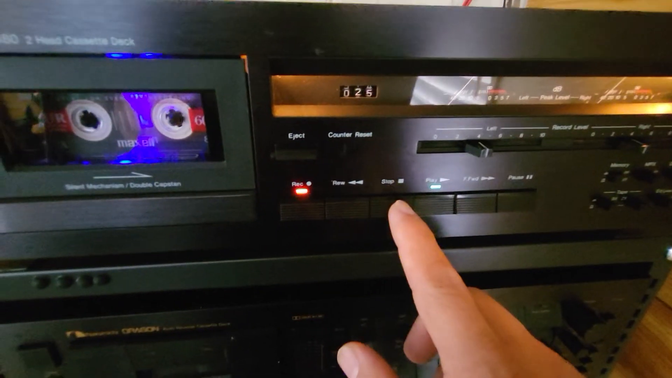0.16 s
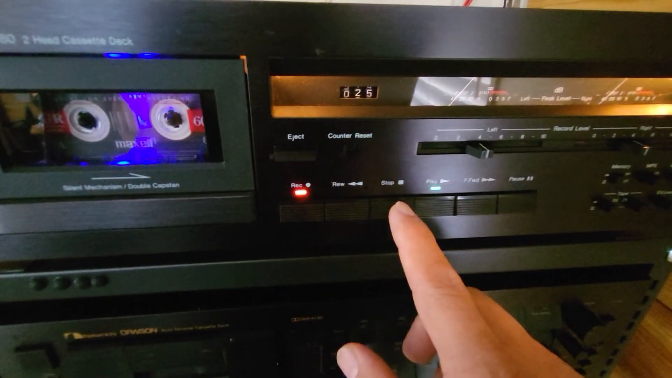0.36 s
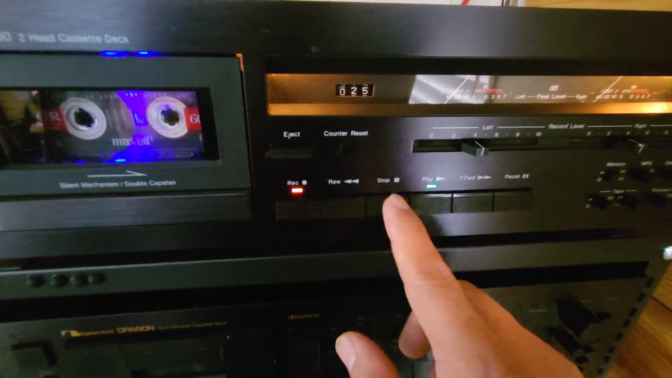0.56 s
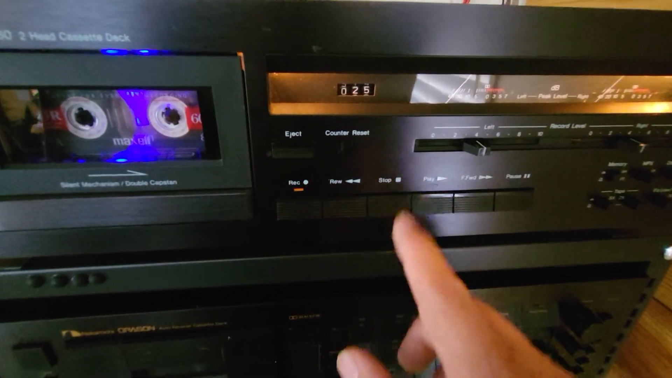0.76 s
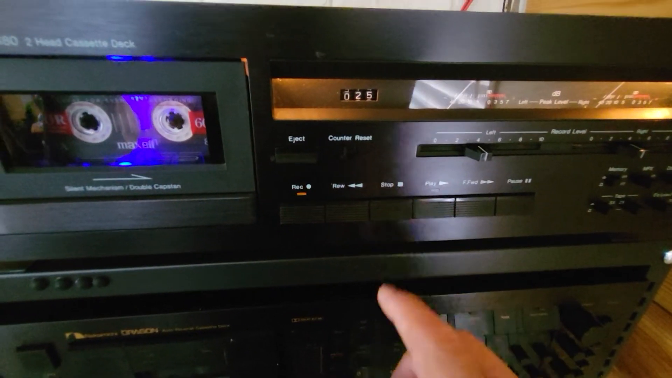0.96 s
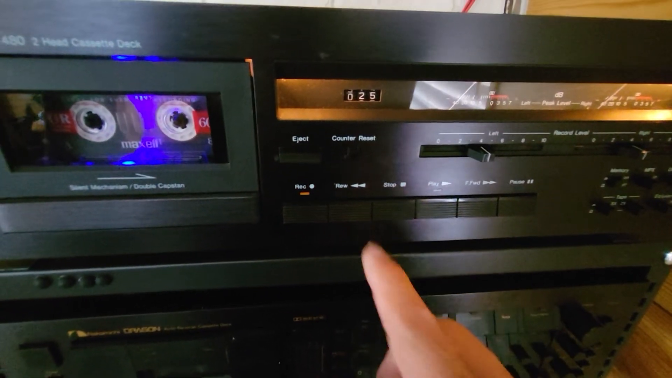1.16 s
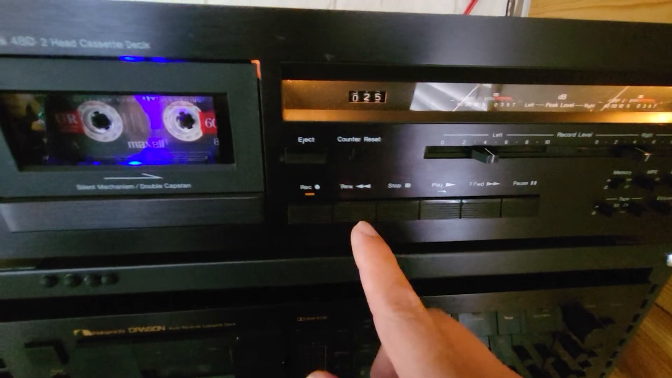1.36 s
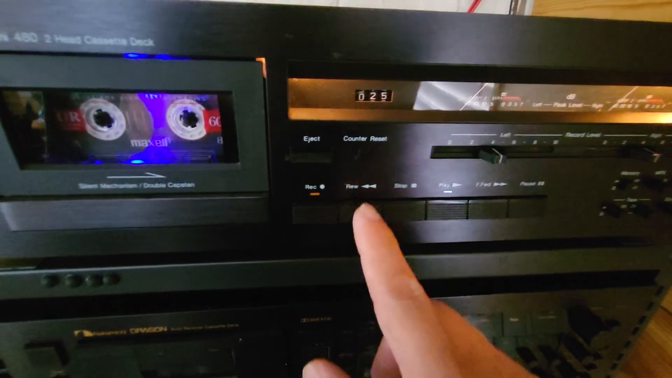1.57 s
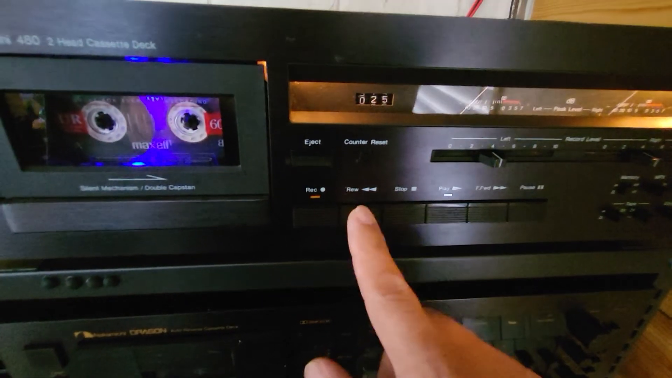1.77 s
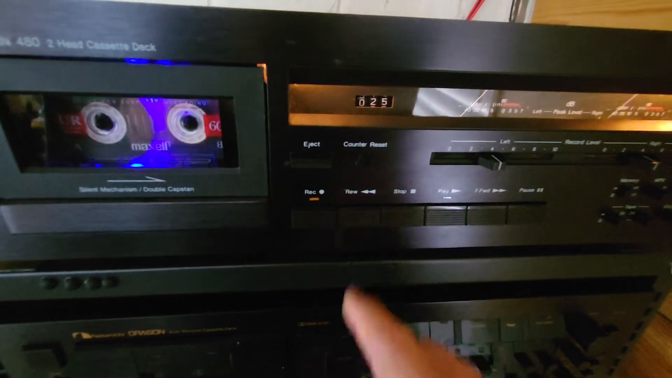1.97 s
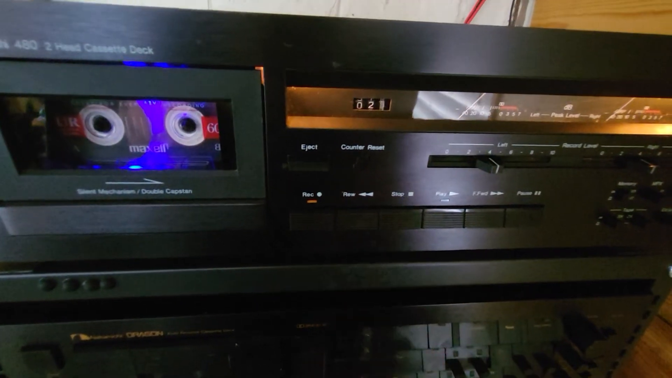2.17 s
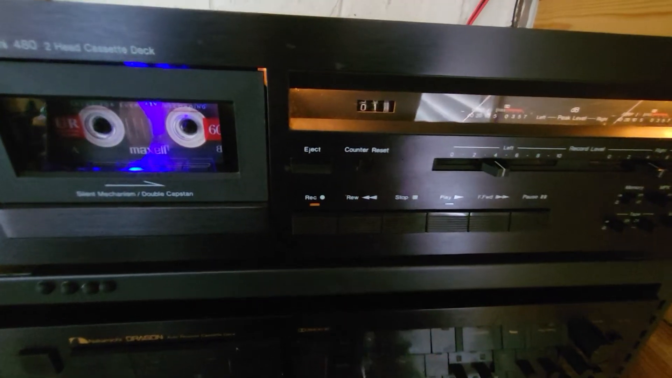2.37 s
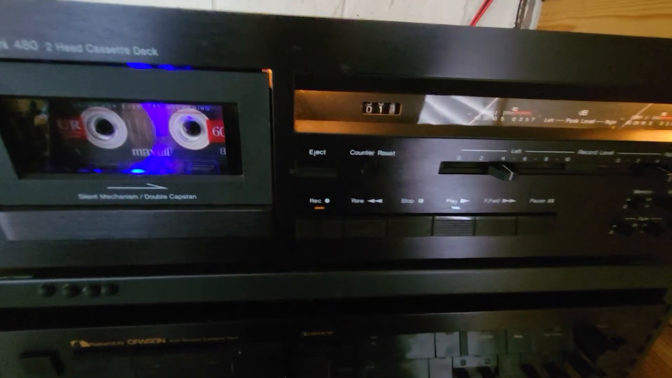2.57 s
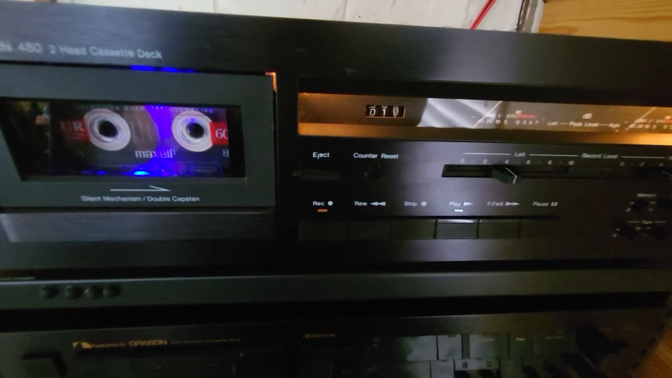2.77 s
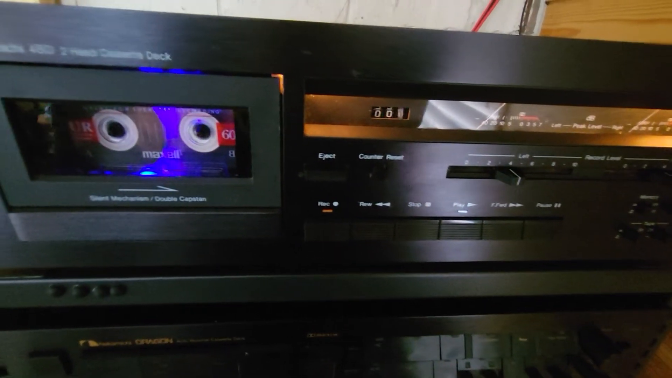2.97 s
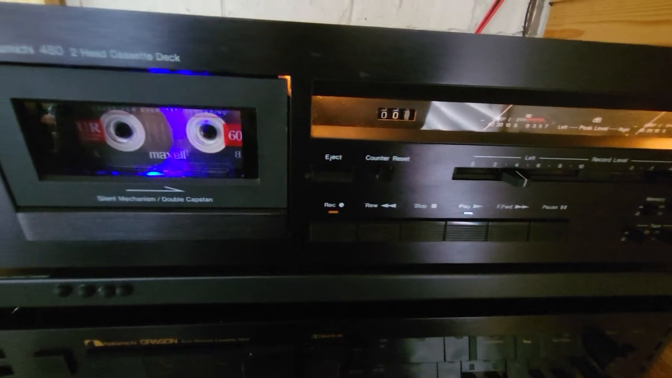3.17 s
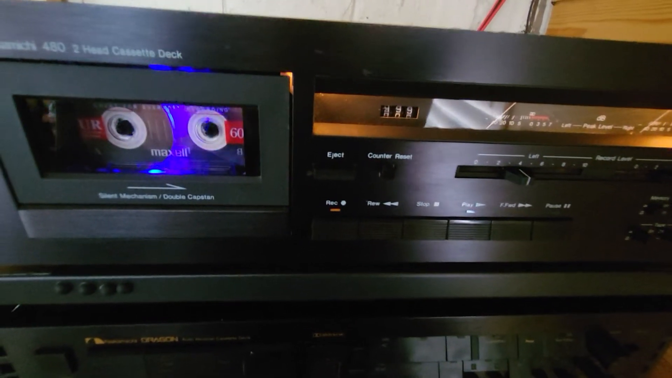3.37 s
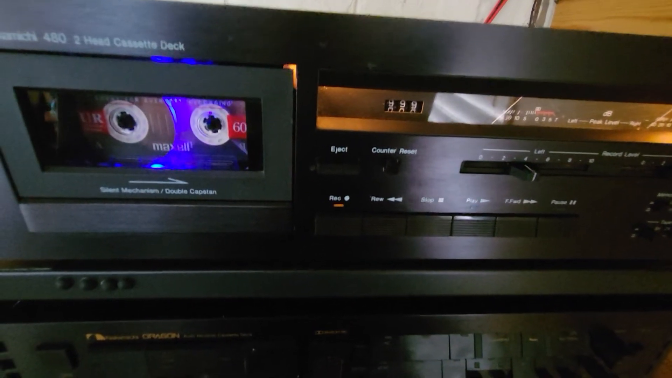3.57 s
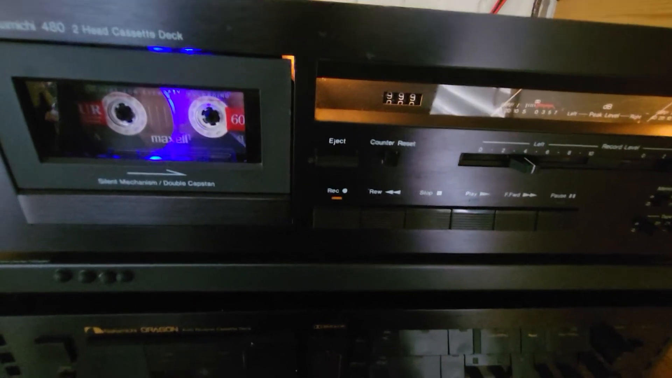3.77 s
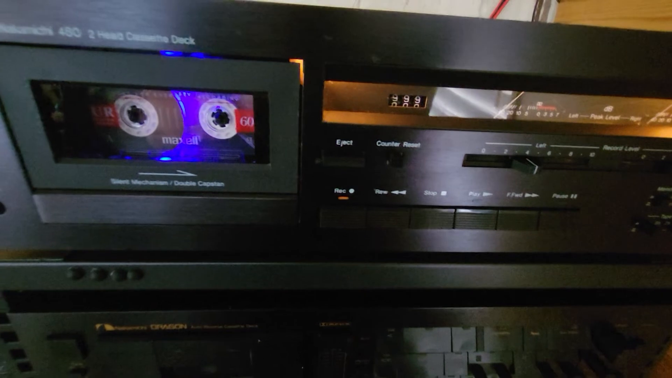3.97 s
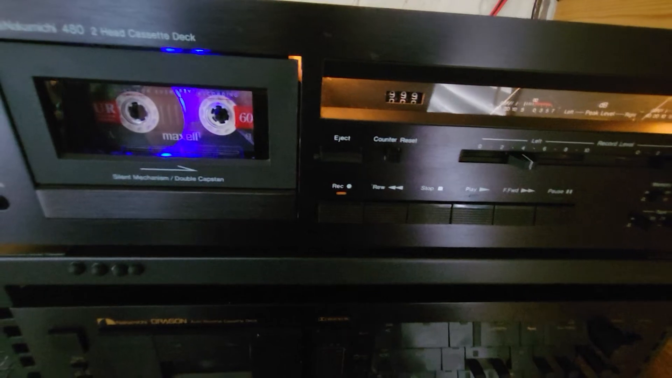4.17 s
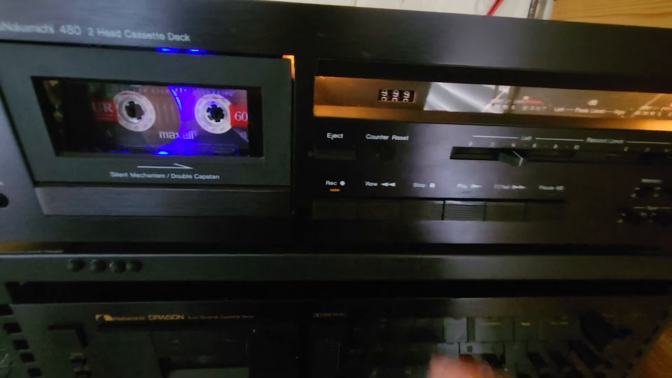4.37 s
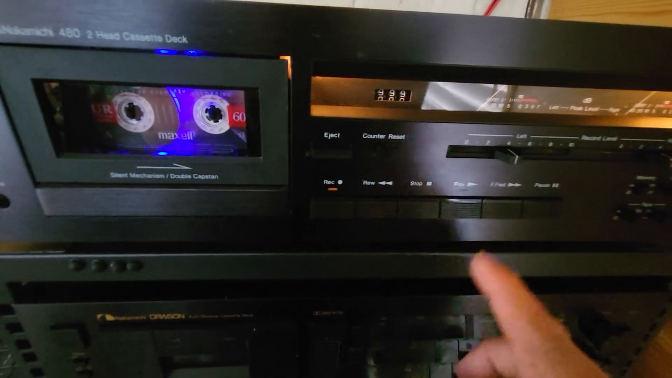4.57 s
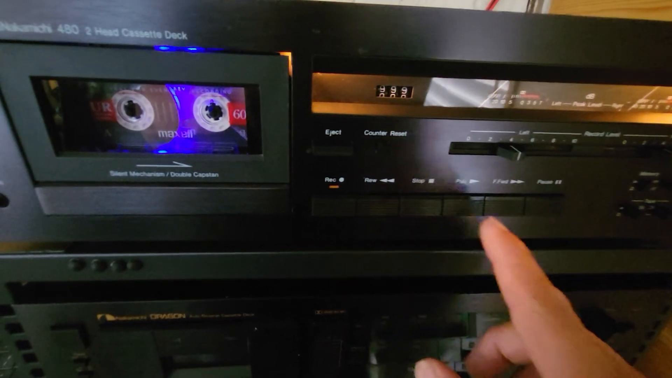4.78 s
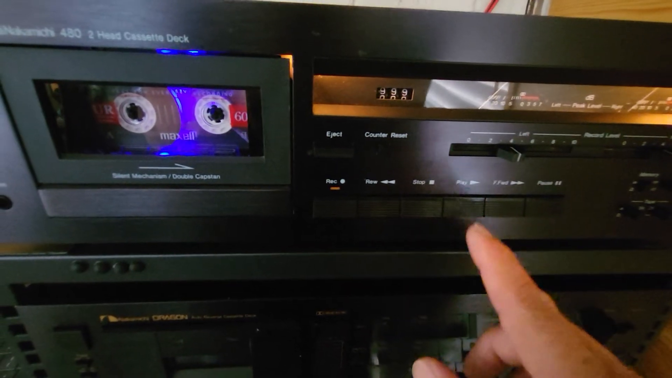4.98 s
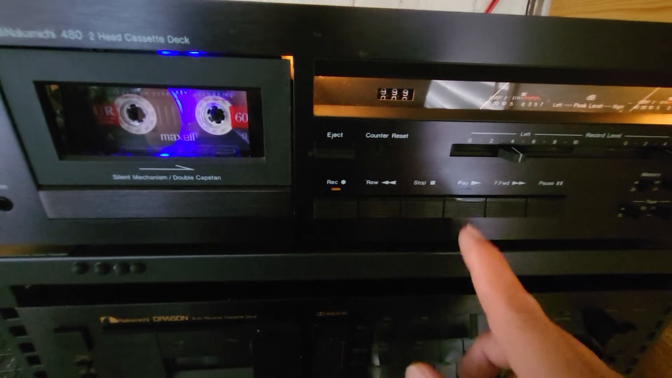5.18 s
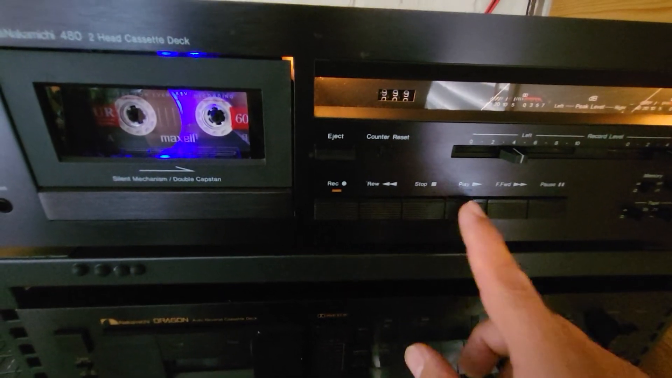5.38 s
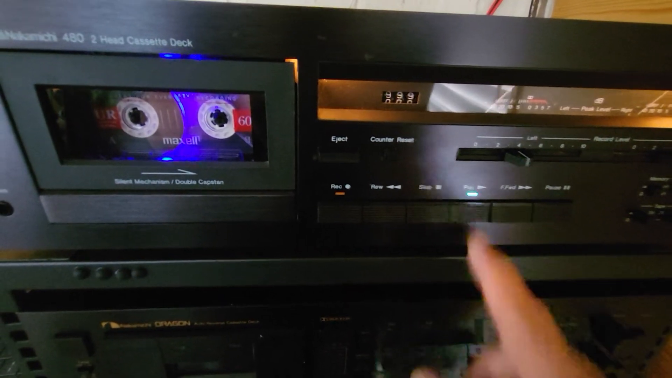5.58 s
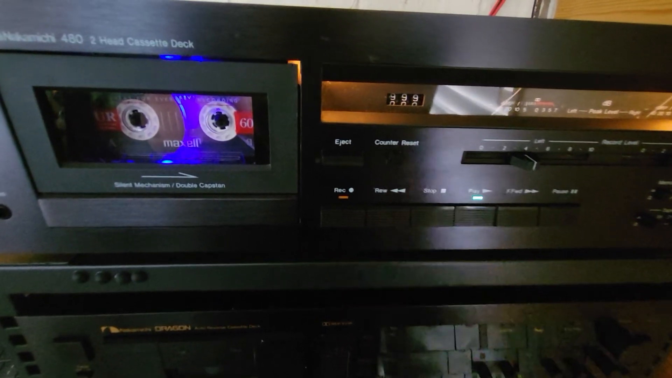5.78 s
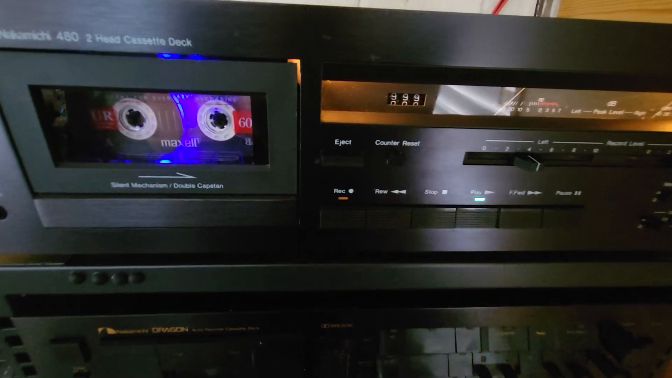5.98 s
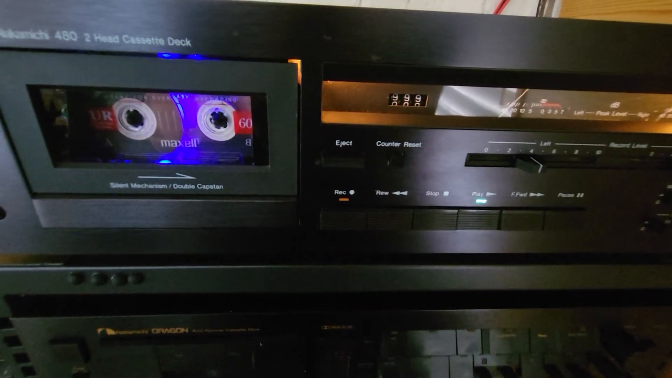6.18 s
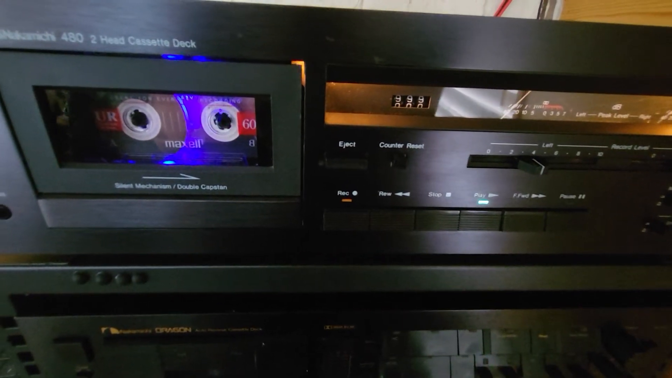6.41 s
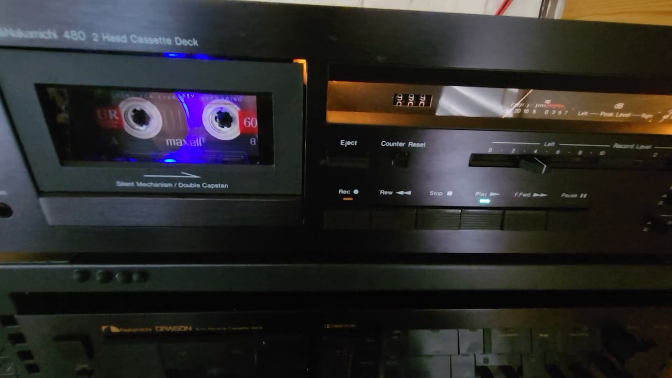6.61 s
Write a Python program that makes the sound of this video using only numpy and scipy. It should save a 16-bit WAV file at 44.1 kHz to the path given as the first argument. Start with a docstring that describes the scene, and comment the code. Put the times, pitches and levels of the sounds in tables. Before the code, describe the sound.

Plastic keys snap on a tape deck in a quiet room, a rewind whirr rises and stops abruptly, later a play key and small clunks.

```python
"""A cassette deck, heard close: stop, rewind and play keys snap in bursts of chatter that ring the front panel.
Motor-driven cams shift heads and brakes, which clunk: softer bursts, each with a ring of its own.
The tape whirrs back for over a second (turn-modulated noise, motor tones) and halts with a snap.
At playing speed it whispers as filtered rattle; drive rumble and hum are wavering sines.
The quiet room adds filtered noise and a short decaying-noise echo."""
import sys
import numpy as np
from scipy import signal
from scipy.fft import rfft, irfft, next_fast_len
from scipy.io import wavfile
from scipy.ndimage import map_coordinates

SR = 44100
rng = np.random.default_rng(int(sys.argv[2]) if len(sys.argv) > 2 else 0)


def bounce(signal):
    """Save signal as a 16-bit WAV file at the path given by the first command-line argument."""
    frames = np.transpose(np.atleast_2d(signal))
    limited = np.clip(frames, -1, 1)
    pcm = np.round(limited * 32767).astype(np.int16)
    wavfile.write(sys.argv[1], SR, pcm)


N = 293265
TIME = np.arange(N) / SR
LEAD_S = 0.02  # start of a contact sound ahead of its landing

# resonances of the transport frame: freq_hz, width_hz, level_db (relative)
FRAME = [(736, 89, 2.5), (1300, 77, 0.5), (1990, 36, -9.5), (2080, 67, -9), (2720, 48, -9),
         (3210, 76, -12.5), (4455, 165, -19.5), (5900, 230, -19), (6210, 41, -14)]
# left-right likeness of the deck noises: freq_hz, correlation
DECK_ALIKE = [(100, .9), (300, .3), (700, 0.25), (1400, -0.65), (3000, 0.096), (12000, 0)]


def keys(size=8192, count=2):
    """Keys and latches touch lightly, snap home, bounce ever duller and ring the front panel."""
    # keys and latches snapping home: start_s, level_db (relative), thump_db, click_db,
    # left_minus_right_db, first_touch_lead_s, first_touch_db, bounce_gap_s, loss_per_bounce_db
    snap_events = [(0.628, -16.5, 0, -2.5, -0.5, 0.0041, -14, .0029, 8.5),
                   (1.735, -34, -10, -2.5, 0.5, .017, -17, 0.0074, 8.5),
                   (3.368, -25, -14, -7, 6.5, .0027, -20, .0075, 3.2),
                   (5.465, -19.5, -4.5, -1.5, 2.5, .034, -30.5, 0.003, 11)]
    # colour of a snap: freq_hz, level_db (per Hz, relative)
    blow_colour = [(50, -37.5), (110, -4.5), (165, 3.5), (240, 4), (310, -11.5), (420, 2.5), (560, -1),
                   (800, -1), (1500, -1.5), (3000, 0), (6500, -6), (10500, -11.5), (14500, -8.5),
                   (16500, -21)]
    # resonances of front panel and case: freq_hz, width_hz, level_db (relative)
    chassis_modes = [(236, 43, -3.5), (784, 55, 1.5), (1210, 150, -3.5), (1440, 43, 1.5), (1590, 20, -18.5),
                     (2000, 71, -2.5), (2240, 42, -13.5), (2700, 190, -7.5), (3310, 190, -8.5),
                     (3490, 130, -2.5), (3700, 80, -14), (4216, 210, -10), (4100, 26.43, -13),
                     (4828, 24, -14), (5370, 30, -18.5), (5830, 68, -10), (6017, 53, -13),
                     (5930, 260, -5.5), (6710, 100, -15), (7234, 64, -16.5)]
    # how the panel radiates: freq_hz, left_minus_right_db
    panel_side = [(60, -2.5), (130, -3.5), (290, 2), (640, -3.5), (1410, -0.5), (3100, 2.0), (6820, -6.5),
                  (15000, -2.5)]
    # light first touch: thump_db, click_db, fizz_db
    touch_tone = (-5, 3.1, 0)
    bounce_thump_db, bounce_click_db, bounce_pan_db = 3.5, -1.16, -4  # change per bounce
    fizz_base_db, fizz_per_click_db = -0.5, 1.2  # top treble follows the click, more steeply

    out, hz = np.zeros((2, N)), np.fft.rfftfreq(size, 1 / SR)
    body = unit(amp(along(blow_colour, hz)) * resonant(chassis_modes, hz, lift_db=10))
    for at_s, level_db, low_db, bright_db, side_db, early_s, touch_db, gap_s, loss_db in snap_events:
        blows = [(at_s - early_s, level_db + touch_db, *touch_tone, side_db)]
        for k in range(count + 1):
            click_db = bright_db + k * bounce_click_db
            tone = (low_db + k * bounce_thump_db, click_db, fizz_base_db + fizz_per_click_db * click_db)
            blows.append((at_s + k * gap_s, level_db - k * loss_db, *tone, side_db + k * bounce_pan_db))
        for start_s, db, thump_db, click_db, fizz_db, pan_db in blows:
            snap = contact(body, thump_db, click_db, fizz_db, t60_s=0.035, attack_s=0.00041,
                           push=7.1, push_delay_s=0.0006, slide_db=-17.0, slide_rise_s=0.0058)
            pan_gain_db = np.array([[pan_db], [-pan_db]]) / 2
            add(out, start_s - LEAD_S, amp(db + 5.0 + pan_gain_db) * snap)
    return filtered(out, lambda hz: amp(along(panel_side, hz) * np.array([[1], [-1]]) / 2))


def levers(size=8192, count=5):
    """Head carriage, brakes and the jerking hub land more softly, each part with a short ring of its own."""
    # levers, brakes and head carriage landing:
    # start_s, level_db (relative), thump_db, hardness_db, ring_hz
    clunk_events = [(0.747, -37, -6, 0.5, 2090), (0.756, -41.5, -8, 9, 1240),
                    (0.768, -32.5, -17, -16, 1460), (0.843, -42.5, 5, 2, 2800),
                    (0.892, -37.5, -9, -3.5, 1250), (0.908, -38.5, -1, -4.5, 810),
                    (0.916, -30.5, -6, -40, 1050), (1.838, -59, 4, -1.5, 1280),
                    (1.872, -51.5, 10, -6, 1470), (1.894, -46, -29, -3, 2300), (1.959, -37, 2, -6.5, 1100),
                    (1.978, -48.5, 20, 3.5, 2770), (3.397, -42.5, 12, 4.5, 854),
                    (3.453, -32.5, -13.5, -13.5, 788), (3.471, -29.5, -2, -26, 1140),
                    (5.573, -41, 0, -4, 2200), (5.638, -45, 1, -20, 1450), (5.686, -45.5, -11, -3, 740),
                    (5.795, -61.5, 6, 14.5, 835), (5.848, -40, -5, -52, 790), (5.89, -41, -13, -8.5, 1420),
                    (5.984, -50.5, -2.8, 0, 840), (6.015, -36, -5, -14.5, 695.4),
                    (6.049, -49, 9, -6.5, 2490), (6.095, -39, -9, -10, 2430)]
    # colour of a clunk: freq_hz, level_db (per Hz, relative)
    knock_colour = [(50, -21), (110, -12), (190, 14), (350, 5.5), (550, -3.5), (800, -5.5), (1500, -5),
                    (3000, 2.5), (5000, -9.5), (7000, -8), (10500, -12.5), (14500, -12), (16500, -25)]
    # hub jerk: thump_db, hardness_db, ring_hz
    jerk_tone = (-13, -12, 760)
    # the hub jerks regularly, ever louder, until the slack is taken up; level is relative
    jerk_start_s, jerk_gap_s, jerk_db, jerk_growth_db = 2.072, 0.063, -45, 1.5
    fizz_base_db, fizz_per_hardness_db = -10, 1.56  # top treble follows the hardness, more steeply

    out, hz = np.zeros((2, N)), np.fft.rfftfreq(size, 1 / SR)
    frame = amp(along(knock_colour, hz)) * resonant(FRAME, hz, lift_db=10.5)
    jerks = [(jerk_start_s + k * jerk_gap_s, jerk_db + k * jerk_growth_db, *jerk_tone)
             for k in range(count)]
    for start_s, db, thump_db, hardness_db, ring_hz in clunk_events + jerks:
        body = unit(frame * resonant([(ring_hz, 0.043 * ring_hz, 0)], hz, lift_db=11.5))
        fizz_db = fizz_base_db + fizz_per_hardness_db * hardness_db
        knock = contact(body, thump_db, hardness_db, fizz_db, t60_s=0.052, attack_s=0.002,
                        push=2.44, push_delay_s=0.00103, slide_db=-10.0, slide_rise_s=0.0038)
        add(out, start_s - LEAD_S, amp(db + 4.0) * knock)
    return out


def contact(body, thump_db, click_db, fizz_db, t60_s, attack_s, push, push_delay_s, slide_db, slide_rise_s):
    """A part slides, then lands: one push in fast-dying chatter, coloured by its hardness and the body."""
    size = 2 * (len(body) - 1)
    t, hz = np.arange(size) / SR - LEAD_S, np.fft.rfftfreq(size, 1 / SR)
    after = np.maximum(t, 0)
    landing = amp(-60 * after / t60_s) * (1 - np.exp(-after / attack_s))
    slide = amp(slide_db) * np.exp(-np.abs(t) / slide_rise_s)
    chatter = rfft(rng.standard_normal((2, size)) * (landing + slide))
    # low notes come from the push alone and reach both microphones alike
    bass = 1 / (1 + (hz / 380) ** 4)
    apart = np.exp(1j * rng.normal(0.83, 0.3) * np.array([[1], [-1]]) * np.minimum(hz / 900, 1))
    # plastic gives a little, so the push holds less treble than the chatter
    push_gain = push * (1 + 0.26 * bass) / np.sqrt(1 + (hz / 5000) ** 2)
    blow = push_gain * np.exp(-2j * np.pi * hz * (LEAD_S + push_delay_s))
    force = chatter * np.sqrt(1 - bass) + blow * apart
    tone = [(350, thump_db), (700, 0.039), (1700, 0.00025),
            (3200, click_db), (6500, click_db), (11000, fizz_db)]
    return irfft(force * causal(body * amp(along(tone, hz)))) * signal.windows.tukey(size, 0.1)


def rewind():
    """Racing hubs rub in the shell, a little harder once a turn, with random knocks; the reel motor whines."""
    # colour of the spinning reels: freq_hz, level_db (per Hz, relative)
    reel_colour = [(100, -6.5), (250, -7.5), (390, -5), (480, -18.5), (610, -13.5), (720, 3), (960, -15.5),
                   (1150, -1), (1600, 1), (1900, -11), (3100, -8), (3500, -15), (5300, -25.5), (6700, -23),
                   (10500, -43.5), (15500, -39)]
    # resonances of the cassette and its door: freq_hz, width_hz, level_db (relative)
    shell_modes = [(733, 140, -8.5), (1109, 46, 0.5), (1344, 112, -5.5), (2100, 95, -1), (2415, 22, -3.5),
                   (2740, 270, -10.5), (4330, 78, -22), (4830, 58, -7), (6340, 92, -14)]
    # tones of the reel motor: freq_hz, level_db (relative)
    whine_tones = [(726.7, -87), (1136, -63), (1287, -58), (2143, -76)]
    start_s, stop_s, level_db = 2.0, 3.361, -47.5  # level is relative
    spin_up_s, spin_up_db, full_speed_turn_hz = 0.17, 19, 30.47

    lag = np.exp(-np.maximum(TIME - start_s, 0) / spin_up_s)
    gain = running(start_s, stop_s, level_db, slope_db_per_s=-1.83, attack_s=0.011, release_s=0.0066)
    gain = gain * amp(-spin_up_db * lag)
    turns = np.cumsum(full_speed_turn_hz * (1 - 0.4 * lag + 0.004035 * wobble(6))) / SR
    sway_db = 1.9 * np.sin(2 * np.pi * turns) + 0.83 * wobble(14) + 0.83 * wobble(110)
    rub = rattle(rate_hz=800, spread_db=3) + 0.74 * rng.standard_normal((2, N))
    rub = rub + 0.79 * repeating(turns, size=1400)
    knocks = amp(-8) * rattle(rate_hz=60, spread_db=3)
    colour = lambda hz: amp(along(reel_colour, hz)) * resonant(shell_modes, hz, lift_db=14.0)
    hubs = stereo(rub * amp(sway_db) + knocks, colour, DECK_ALIKE)
    shaft_s = np.cumsum(1 + 0.0031 * wobble(11)) / SR  # wavering time base
    whine = unit(sum(amp(db + 1.5 * wobble(25)) * np.sin(2 * np.pi * (hz * shaft_s + rng.random((2, 1))))
                     for hz, db in whine_tones))
    return gain * (amp(3.5) * hubs + amp(-10) * whine) * amp([[0.5], [-0.5]])


def cam():
    """The cam motor whirrs, alike in every run, and its gears chatter as random impacts and noise."""
    # runs of the cam motor: start_s, stop_s, gear level_db (relative), slope_db_per_s
    cam_runs = [(0.656, 0.923, -47, -22.5), (1.88, 1.977, -59.5, -35), (3.367, 3.473, -41, -190),
                (5.625, 6.02, -66, 14)]
    # colour of the cam gears: freq_hz, level_db (per Hz, relative)
    gear_colour = [(90, -20.5), (200, 0), (400, 4), (560, -4.5), (780, -1.5), (1000, -12.5), (1400, 2),
                   (2000, -9), (3000, -11), (4500, -23.5), (6800, -22.5), (10500, -34.5), (15500, -41)]
    whirr_hz, whirr_width_hz, whirr_db = 1420, 90, -61.5

    gain = sum(running(*run, attack_s=0.044, release_s=0.022) for run in cam_runs)
    teeth = rattle(rate_hz=500, spread_db=1) + 0.44 * rng.standard_normal((2, N))
    colour = lambda hz: amp(along(gear_colour, hz)) * resonant(FRAME, hz, lift_db=6.5)
    powered = sum(running(start_s, stop_s, whirr_db, 0, attack_s=0.06, release_s=0.03)
                  for start_s, stop_s, *_ in cam_runs)
    whirr_colour = lambda hz: 1 / (1 + ((hz - whirr_hz) / whirr_width_hz) ** 2)
    whirr = stereo(rng.standard_normal((2, N)), whirr_colour, DECK_ALIKE)
    return amp(4.5) * gain * stereo(teeth, colour, DECK_ALIKE) + powered * whirr


def tape():
    """At playing speed the tape only whispers in its shell: a dense, filtered rattle."""
    # tape sliding over the heads: start_s, stop_s, level_db, slope_db_per_s
    play_runs = [(0, 0.638, -80, 6), (5.982, 6.7, -76.5, -13)]
    points = [(300, -13.0), (700, 6.0), (2800, -5.5), (6500, -8.5), (10000, -24.5)]
    gain = sum(running(*run, attack_s=0.013, release_s=0.03) for run in play_runs)
    return gain * stereo(rattle(rate_hz=3860, spread_db=0.5), lambda hz: amp(along(points, hz)), DECK_ALIKE)


def drive():
    """The turning drive shakes the case at its shaft rate: wavering sines."""
    # runs of the drive: start_s, stop_s, level_db (relative), slope_db_per_s, shaft_hz
    drive_runs = [(-0.1, 1.28, -50, -3.5, 45.24), (1.44, 1.98, -50.5, -1, 46.7), (2.33, 3.205, -55, -2, 47)]
    out = 0
    for *run, hz in drive_runs:
        shake = np.sqrt(2) * np.sin(2 * np.pi * hz * TIME + 0.36 * wobble(15))
        out = out + running(*run, attack_s=0.13, release_s=0.093) * shake
    return out * amp(0.8 * wobble(12) + 1.2 * wobble(3.3)) * amp([[-1.2], [0.6]])


def hum():
    """Steady, slightly wavering lines of transformer and capstan motor."""
    # hum lines: freq_hz, level_db (relative)
    hum_lines = [(75.4, -67), (118.4, -66), (269.2, -73), (290.7, -78), (349.9, -76), (581.4, -97)]
    lines = sum(amp(db + 0.46 * wobble(5)) * np.sqrt(2) * np.sin(2 * np.pi * hz * TIME + 0.5 * wobble(0.7))
                for hz, db in hum_lines)
    return lines * amp([[-2], [0.5]])


def background():
    """Low room noise, thin microphone hiss and a faint high buzz whose pattern repeats at 120 Hz."""
    # room noise: freq_hz, level_db (per Hz, relative)
    air_colour = [(13, -66.5), (22, -35), (54, -5.5), (81, -6), (128, -8.5), (151, -20), (270, -14),
                  (297, -23), (352, -10), (437, -17.5), (543, -28), (628, -26), (819, -35.5), (7000, -51.5),
                  (9100, -78.5), (15400, -120)]
    # left-right likeness of the room noise: freq_hz, correlation (clipped to +-1)
    air_alike = [(60, 0.95), (150, 0.72), (380, -0.113), (950, -0.53), (2380, -0.29), (5980, 0.03),
                 (15000, -3.2)]
    # microphone hiss, also colours the buzz: freq_hz, level_db (per Hz, relative)
    hiss_colour = [(5000, -30), (7500, -17), (10000, -4.5), (11200, -5), (11850, 7), (12400, 0.5),
                   (13000, -1), (13800, -4), (15800, -12)]
    buzz_hz, buzz_db, buzz_swing_db = 120, -85.5, 3.5

    air = stereo(rng.standard_normal((2, N)), lambda hz: amp(along(air_colour, hz)), air_alike)
    hiss = unit(filtered(rng.standard_normal((2, N)), lambda hz: amp(along(hiss_colour, hz))))
    cycles = buzz_hz * TIME + 0.004 * wobble(2)
    pulses = repeating(cycles, size=367) * amp(buzz_swing_db * np.cos(2 * np.pi * cycles))
    buzz = unit(filtered(pulses, lambda hz: amp(along(hiss_colour, hz))))
    return air * amp([[-59.5], [-57.5]]) + amp(-84.5) * hiss + amp(buzz_db) * buzz


def room(x, length):
    """Small-room echo: decaying noise, length scales the decay; bass is alike on both sides."""
    # decay at length 1: freq_hz, t60_s
    decay_points = [(150, 0.41), (700, 0.31), (3000, 0.31), (7000, 0.25), (14000, 0.13)]
    hz, t, z = signal.stft(rng.standard_normal((2, SR // 2)), SR, nperseg=256)
    z = np.where(hz[:, None] < 300, z[0], z)
    t60_s = length * along(decay_points, hz)[:, None]
    tail = signal.istft(z * amp(-60 * t / t60_s), SR, nperseg=256)[1]
    tail = tail * (1 - np.exp(-np.arange(tail.shape[1]) / SR / 0.004))  # soft onset
    return signal.fftconvolve(x, tail / np.linalg.norm(tail[0]), axes=1)[:, :N]


def amp(db):
    """Decibels to gain."""
    return 10 ** (np.asarray(db) / 20)


def unit(x):
    """Scale to rms 1."""
    return x / np.sqrt(np.mean(np.abs(x) ** 2) + 1e-20)


def along(points, hz):
    """Interpolate (freq_hz, value) points on a log axis."""
    f, v = np.transpose(points)
    return np.interp(np.log(hz + 1), np.log(f + 1), v)


def wobble(rate_hz):
    """A smooth random curve, rate_hz knots a second."""
    return map_coordinates(rng.standard_normal(int(N * rate_hz / SR) + 4), [TIME * rate_hz])


def filtered(x, response):
    """x times a response of frequency."""
    m = 2 * next_fast_len(N // 2 + SR // 4)
    return irfft(rfft(x, m) * response(np.fft.rfftfreq(m, 1 / SR)), m)[..., :N]


def causal(gain):
    """Minimum-phase response with this gain: it rings only after the blow."""
    cepstrum = irfft(np.log(np.maximum(gain, 1e-6)))
    half = len(cepstrum) // 2
    return np.exp(rfft(cepstrum * np.r_[1, np.full(half - 1, 2), 1, np.zeros(half - 1)]))


def resonant(modes, hz, lift_db):
    """Gain of resonances that stand above a flat response."""
    return np.sqrt(1 + sum(amp(db + lift_db) ** 2 / (1 + (2 * (hz - f) / width) ** 2)
                           for f, width, db in modes))


def stereo(pair, colour, alike):
    """Two unrelated signals become a coloured left and right of joint rms 1."""
    turn = lambda hz: np.arccos(np.clip(along(alike, hz), -1, 1)) / 2
    mid, side = filtered(pair, lambda hz: colour(hz) * np.array([np.cos(turn(hz)), np.sin(turn(hz))]))
    return unit(np.array([mid + side, mid - side]))


def rattle(rate_hz, spread_db):
    """Random tiny impacts of uneven strength, rms 1."""
    hits = rng.random((2, N)) < rate_hz / SR
    return unit(hits * rng.standard_normal((2, N)) * amp(spread_db * rng.standard_normal(N)))


def repeating(turns, size):
    """A random rough pattern that comes round once a turn, rms 1."""
    rows = rng.standard_normal((2, size))
    return unit(np.array([map_coordinates(row, [turns % 1 * size], mode="grid-wrap") for row in rows]))


def running(start_s, stop_s, db, slope_db_per_s, attack_s, release_s):
    """Gain of a part that starts, runs with a drift in level and coasts to rest."""
    held = np.clip(TIME, start_s, stop_s) - start_s
    coast = np.exp(-np.maximum(TIME - stop_s, 0) / release_s)
    return amp(db + slope_db_per_s * held) * np.minimum(held / attack_s, 1) * coast


def add(out, start_s, sound):
    """Mix a short sound in at start_s."""
    out[:, round(start_s * SR):][:, :sound.shape[1]] += sound


def scene():
    """Keys sound straight into the room; the works have a shorter echo."""
    snaps = keys()
    works = levers() + cam() + rewind() + tape()
    echo = amp(-14.5) * room(snaps, length=0.76) + amp(-9.5) * room(works, length=0.55)
    return snaps + works + echo + drive() + hum() + background()


def record(dry):
    """A narrow dip near 8.5 kHz dulls the treble; a steep low-pass limits the band at 16.1 kHz."""
    # treble dip: freq_hz, level_db
    treble_dip = [(7000, 0.5), (7800, -4.5), (8500, -16.5), (9100, -6.5), (9900, -2), (10800, 4)]
    heard = filtered(dry, lambda hz: causal(amp(along(treble_dip, hz))))
    return filtered(heard, lambda hz: 1 / np.sqrt(1 + (hz / 16100) ** 160))


dry = scene()
out = record(dry)
bounce(out)
```